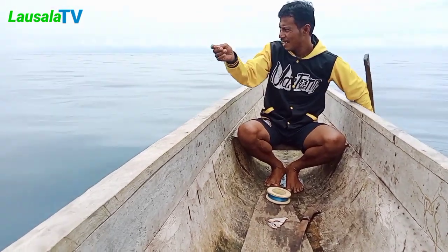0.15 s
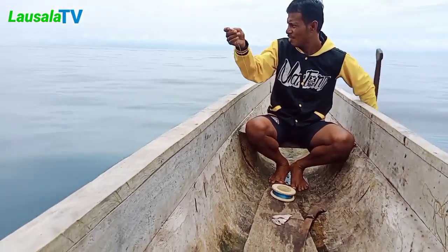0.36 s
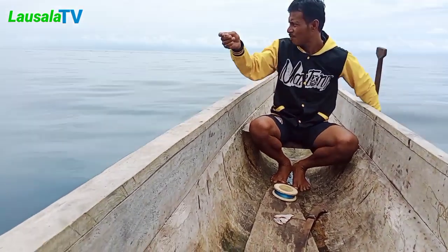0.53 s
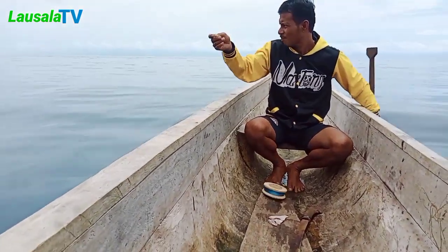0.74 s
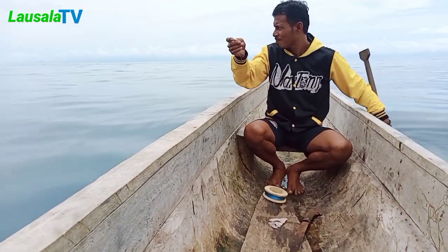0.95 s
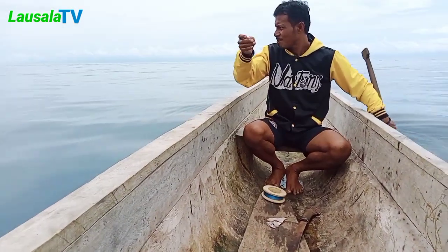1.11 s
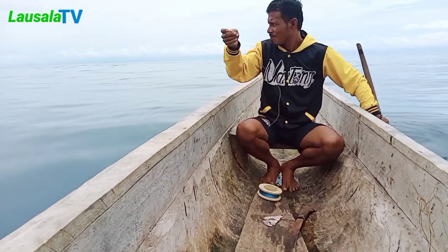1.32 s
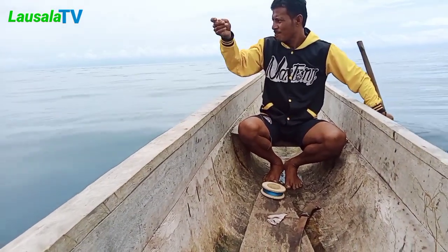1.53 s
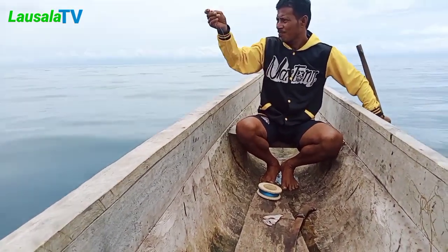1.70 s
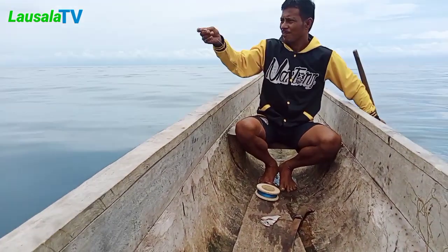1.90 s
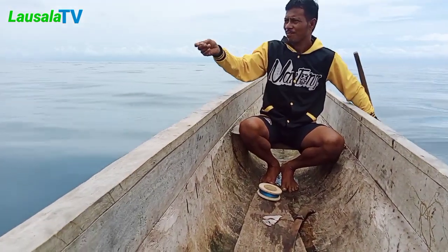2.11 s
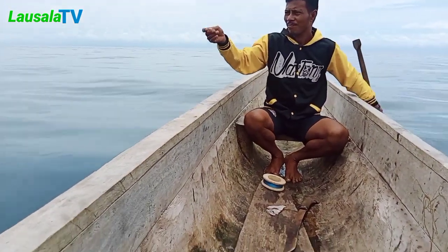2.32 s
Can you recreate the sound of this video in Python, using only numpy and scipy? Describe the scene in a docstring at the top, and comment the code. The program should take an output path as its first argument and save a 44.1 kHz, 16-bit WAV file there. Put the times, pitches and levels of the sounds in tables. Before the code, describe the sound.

Hollow wooden knock of a paddle on a small boat's side, quick bounces and snaps, then a lull of faint water trickle and gurgle before another lighter double knock; close single microphone outdoors, no echo.

```python
"""Water is heard first, lapping and hissing quietly all around a small wooden boat on a calm sea.
A paddle knocks twice against the boat's side and bounces: pushes ring hull and shaft modes, dry, with no echo.
Bursts of clicks make the snaps, dying sines the drips and low thumps, gliding sines the squeaks and chirps.
Noise in bands makes the water, a gurgle and small ticks. One microphone channel takes it all."""
import sys
import numpy as np
from scipy import signal
from scipy.io import wavfile

SR = 44100
rng = np.random.default_rng(int(sys.argv[2]) if len(sys.argv) > 2 else 0)


def wav_out(sig):
    """Save sig, one row per channel (or a flat mono array), as 16-bit PCM at SR to the path in sys.argv[1]."""
    wavfile.write(sys.argv[1], SR, np.round(np.clip(np.atleast_2d(sig).T, -1, 1) * 32767).astype(np.int16))


def how_loud(loudness_db):
    """Turn decibels into a plain amplitude multiplier (0 dB gives 1, 20 dB gives 10)."""
    steps = np.asarray(loudness_db, float) / 20
    return 10 ** steps


N = 103635


def rms_one(x):
    """Scale to rms 1."""
    return x / np.sqrt(np.mean(x ** 2) + 1e-20)


def in_time(rows):
    """Columns of a table, joined by straight lines in time."""
    s, *columns = np.transpose(rows)
    return [np.interp(np.arange(N) / SR, s, c) for c in columns]


def drift(rate_hz):
    """Slow chance of spread 1: noise through two equal low-pass poles, drawn every 40 samples."""
    r = np.exp(-80 * np.pi * rate_hz / SR)
    white = rng.standard_normal(N // 40 + 2002)
    slow = signal.lfilter([1], [1, -2 * r, r * r], white)[2000:]  # skip the filter's start
    return np.interp(np.arange(N) / 40, np.arange(len(slow)), rms_one(slow))


def ring(modes, gains_db, swell_s):
    """Struck body: a sum of swelling, dying sines of alternating sign, half a second long."""
    hz, db, t60 = np.transpose(modes)[:, :, None]
    t = np.arange(SR // 2) / SR
    sign = (-1) ** np.arange(len(modes))[:, None]
    decay = how_loud(db + gains_db[:, None] - 60 * t / t60)
    swell = 1 - np.exp(-t / swell_s)
    return (sign * decay * swell * np.sin(2 * np.pi * hz * t)).sum(0)


def add(out, s, sound):
    """Lay a sound down at time s."""
    i = int(s * SR)
    out[i:i + len(sound)] += sound[:len(out) - i]


def banded_noise(spectrum, patchy_db, rate_hz):
    """Narrow bands of noise, each with its level and flicker; rms 1."""
    hz, db = np.transpose(spectrum)
    bands = int(5 * np.log2(hz[-1] / hz[0])) + 1  # about five per octave
    edges = np.geomspace(hz[0], hz[-1], bands + 1)
    white, together, out = rng.standard_normal((2, N)), drift(rate_hz / 2), 0
    for k, (low, high) in enumerate(zip(edges, edges[1:])):
        sos = signal.butter(2, [low, high], "band", fs=SR, output="sos")
        band = signal.sosfilt(sos, white[k % 2])
        level_db = np.interp(np.log(low * high) / 2, np.log(hz), db)
        flicker_db = patchy_db * (.6 * together + drift(rate_hz))
        out = out + band * how_loud(level_db + flicker_db)
    return rms_one(out)


TRICKLES_PER_S, TRICKLE_CYCLES = 200, 20.0   # typical rate; cycles in which a bubble dies by 60 dB


def trickles():
    """Tiny random bubbles, short dying sines over nearly three octaves; rms 1."""
    sizes = how_loud(3.0 * np.minimum(rng.exponential(1, N), 3))
    sizes = sizes * (rng.random(N) < TRICKLES_PER_S * how_loud(3.0 * drift(5)) / SR)
    dealt, out = rng.integers(0, 16, N), 0  # each bubble gets one of 16 pitches
    for k, hz in enumerate(np.geomspace(500, 3500, 16)):
        r = how_loud(-60 * hz / (TRICKLE_CYCLES * SR))
        w = 2 * np.pi * hz / SR
        strikes = sizes * (dealt == k) + 1e-18
        out = out + signal.lfilter([0, np.sin(w)], [1, -2 * r * np.cos(w), r * r], strikes)
    return rms_one(out)


# how lively the water around the boat is, as its hiss at the microphone: t/s, level/dB
LIVELINESS = [(0, -65), (.77, -65.5), (.81, -71), (1.62, -70.5), (1.7, -64.5), (1.9, -64.5), (2.18, -62),
              (2.35, -58)]
# colour of the hiss, relative level per Hz: f/Hz, level/dB
HISS_COLOUR = [(250, -6), (500, -12), (1600, -12), (3500, -15), (4600, -24.5), (5600, -28.5)]
# colour of the treble fizz, relative level per Hz: f/Hz, level/dB
FIZZ_COLOUR = [(4600, -10.5), (5800, -4.5), (6900, -12), (8200, -0.5), (9600, -11.5), (15500, -9)]
# the treble flutters up briefly: t/s, level rise/dB
FLUTTERS = [(0.053, 12), (0.472, 9), (0.644, 12), (0.711, 11), (1.011, 16.5), (1.82, 9), (2.212, 8)]
# low lapping at the microphone: t/s, level/dB
LAPPING = [(0, -56), (.22, -79), (.31, -46), (.65, -69), (2.03, -70.5), (2.11, -47), (2.35, -59.5)]
# colour of the lapping, relative level per Hz: f/Hz, level/dB
LAPPING_COLOUR = [(22, -42), (50, -13), (92, 0), (200, -7.5), (400, -13.5)]
TRICKLE_DB, FLUTTER_S = -5, 0.0099   # trickles against hiss; spread of each flutter
FIZZ_DB, FIZZ_FOLLOWS = -82, 1   # fizz at mean liveliness; share of the swing it follows


def sea():
    """Water noise: hiss with trickles, treble fizz that follows the liveliness, and low lapping."""
    t = np.arange(N) / SR
    lively_db, = in_time(LIVELINESS)
    hiss = banded_noise(HISS_COLOUR, patchy_db=.8, rate_hz=15.0)
    water = how_loud(lively_db) * (hiss + how_loud(TRICKLE_DB) * trickles())
    rise_db = sum(db * np.exp(-.5 * ((t - s) / FLUTTER_S) ** 2) for s, db in FLUTTERS)
    fizz_db = FIZZ_DB + FIZZ_FOLLOWS * (lively_db - lively_db.mean()) + rise_db
    fizz = how_loud(fizz_db) * banded_noise(FIZZ_COLOUR, patchy_db=1.2, rate_hz=25.0)
    lap_db, = in_time(LAPPING)
    lapping = how_loud(lap_db) * banded_noise(LAPPING_COLOUR, patchy_db=1.5, rate_hz=2.0)
    return water + fizz + lapping


# drips and low thumps, level before the swell, f at the start: t/s, level/dB, f/Hz, t60/s
DRIPS_AND_THUMPS = [(.0225, -44.5, 1910, 0.062), (0.0271, -35.5, 3080, 0.0063), (0.101, -43.5, 106.6, 0.07),
                    (.179, -46.5, 3370, 0.039), (0.409, -38.5, 1200, 0.028), (.645, -41.5, 563, 0.052),
                    (0.667, -51.5, 1630, 0.066), (0.707, -50, 800, 0.022), (1.856, -48, 115.2, 0.046)]


def drips_and_thumps():
    """Single drips and soft low thumps: a sine that swells, dies and rises a little."""
    out, t = np.zeros(N), np.arange(SR // 5) / SR
    for s, db, hz, t60 in DRIPS_AND_THUMPS:
        swell = 1 - np.exp(-t / (0.021 * t60))
        tone = np.sin(2 * np.pi * hz * t * (1 + 0.08 * t / t60))
        add(out, s, how_loud(db - 60 * t / t60) * swell * tone)
    return out


# faint high chirps, peak level: t/s, length/s, level/dB
CHIRPS = [(0.136, 0.052, -75), (.485, 0.041, -77.5), (1.159, 0.075, -81.5), (1.253, .055, -77)]
CHIRP_HZ, CHIRP_RISE_HZ = 7140, 659   # pitch at the start; rise by the end


def chirps():
    """Faint high whistles that swell, bend upward with a wavering pitch, and fade."""
    out, waver_hz = np.zeros(N), 90 * drift(150)
    for s, length, db in CHIRPS:
        u = np.arange(int(length * SR)) / (length * SR)
        hz = CHIRP_HZ + CHIRP_RISE_HZ * u ** 2 + waver_hz[int(s * SR):][:len(u)]
        tone = np.sin(2 * np.pi * np.cumsum(hz) / SR)
        add(out, s, how_loud(db) * np.sin(np.pi * u) * tone)
    return out


# paddle against the boat's side, heard dry: t/s, hull level/dB, shaft level/dB, contact/ms
KNOCKS = [(0.208, -22, -42, 1.03), (0.2156, -7, 4, 0.54), (.2310, -15.5, -22, 0.69), (0.291, -23, -25, 0.3),
          (0.2936, -16.5, -17, 0.18), (0.3044, -26, -9, 0.74), (0.34, -21, -27, 1.66),
          (0.354, -28, -35, 0.77), (0.3966, -34, -46, 0.36), (0.502, -33.5, -38, 3.4),
          (1.669, -42, -74.5, 1.51), (1.9511, -30.5, -28, 1.12), (2.0486, -11.5, -10, 0.26),
          (2.0585, -27.5, -21, 0.18), (2.1075, -22, -26.5, 0.19), (2.129, -27.5, -25, 2.1),
          (2.199, -37.5, -77, 1.2), (2.286, -42, -74, 1.74), (2.336, -33.5, -69, 3.1)]
# hull modes before scatter: f/Hz, relative level/dB, t60/s
HULL = [(167.24, -21, 0.3), (196, -15, 0.06), (277.7, -15.5, .09), (338, -13.5, 0.13), (435.4, -13, 0.1),
        (527.4, -10, 0.067), (668, -14, 0.08), (925, -12, .035)]
# paddle shaft modes before scatter: f/Hz, relative level/dB, t60/s
SHAFT = [(745.5, -3.5, 0.028), (813.3, -3.5, 0.011), (1205, -19, 0.03), (1369, -25, 0.046),
         (1634, -26, 0.042), (1940, -33, .03)]
# modes differ in level from blow to blow, hull modes in pitch too (as a share), and take a moment to swell
MODE_SCATTER_DB, PITCH_SCATTER, SWELL_S = 3, .025, 0.0007
# loose planks keep shaking the hull after a blow: level against the blow, decay, lumpiness
SHUDDER_DB, SHUDDER_T60_S, SHUDDER_ROUGH_DB = -31.5, 0.25, 6.5
SHUDDER_TILT_DB = -5.5   # per octave
# dry edge of a 1 ms contact, against the hull; harder contacts crack more
CRACK_DB, CRACK_S, CRACK_RISE_S = -30, 0.0069, .0005


def knocks():
    """Smooth pushes (longer = duller) ring hull and shaft, with a faint crack; a lumpy shudder follows."""
    out, strength, edge = np.zeros((3, N))
    t, hulls = np.arange(SR // 2) / SR, len(HULL)
    scatter = MODE_SCATTER_DB * rng.standard_normal((len(KNOCKS), hulls + len(SHAFT)))
    # only the first column, the pitch, is detuned
    detune = 1 + PITCH_SCATTER * rng.standard_normal((len(KNOCKS), hulls, 1)) * [1, 0, 0]
    for (s, hull_db, shaft_db, ms), chance_db, bend in zip(KNOCKS, scatter, detune):
        contact = ms * SR / 1000  # samples
        push = np.sin(np.pi * np.arange(int(contact) + 1) / contact) ** 2
        hull = ring(HULL * bend, hull_db + chance_db[:hulls], SWELL_S)
        shaft = ring(SHAFT, shaft_db + chance_db[hulls:], SWELL_S)
        add(out, s, signal.fftconvolve(hull + shaft, push / push.sum()))
        add(strength, s, how_loud(hull_db + SHUDDER_DB - 60 * t / SHUDDER_T60_S))
        crack_shape = np.exp(-t / CRACK_S) * (1 - np.exp(-t / CRACK_RISE_S))
        add(edge, s, how_loud(hull_db + CRACK_DB) / ms * crack_shape)
    shake = strength * rng.standard_normal(N) * how_loud(SHUDDER_ROUGH_DB * drift(90))
    hull_hz = np.array(HULL)[:, 0]
    tilt_db = SHUDDER_TILT_DB * np.log2(hull_hz / hull_hz[0])
    damped_hull = ring(HULL, tilt_db, SWELL_S) * np.exp(-t / .015)
    shudder = signal.fftconvolve(shake, damped_hull)[:N]
    band = signal.butter(4, [1400.0, 2600.0], "band", fs=SR, output="sos")
    crack = signal.sosfilt(band, edge * rng.standard_normal(N))
    return out + crack + shudder


# dry snaps: t/s, level/dB, extra level of the lowest mode/dB, extra level of the three highest/dB
SNAPS = [(0.3157, -28, -9.5, 0.5), (0.3226, -24.5, -10.5, -2), (0.3272, -27, 9.5, 2.5),
         (0.332, -43.5, 15.5, -3.5)]
# what snaps rings with: f/Hz, relative level/dB, t60/s
SNAPPER = [(1456, 3.5, 0.013), (2110, -13, 0.011), (3335, 0, 0.015), (4600, -5, 0.0057),
           (5830, -9.5, 0.006), (8086, -3, 0.0078), (11200, -14, 0.0041), (14200, -16, 0.0018)]
BURST_S, RASP_DB, RASP_S = .0005, -15, .004   # burst decay; fine crackle that trails each snap


def snaps():
    """A short ragged burst of clicks strikes small bright modes; the lowest mode rings on its own."""
    out, t = np.zeros(N), np.arange(300) / SR
    highest = np.arange(1, len(SNAPPER)) >= len(SNAPPER) - 3
    for (s, db, low_db, high_db), burst in zip(SNAPS, rng.standard_normal((len(SNAPS), 300))):
        burst = burst * (np.exp(-t / BURST_S) + how_loud(RASP_DB) * np.exp(-t / RASP_S))
        burst = burst / np.sqrt((burst ** 2).sum())
        bright = ring(SNAPPER[1:], db + high_db * highest, swell_s=.00004)
        add(out, s, signal.fftconvolve(bright, burst))
        add(out, s, ring(SNAPPER[:1], np.array([db + low_db]), swell_s=0.00045))
    return out


# faint gliding squeaks, one list each, rms level before flutter: t/s, f/Hz, level/dB
SQUEAKS = [
    [(.395, 1580, -62), (.45, 1696, -62.5), (.485, 1773, -69.5)],
    [(.498, 2014, -90), (.51, 1940, -62.5), (.545, 1800, -67.5), (.58, 1680, -54), (.6, 1620, -60.5),
     (.635, 1135, -68.5)],
]
SQUEAK_FLUTTER_DB = 3.5


def squeaks():
    """Thin gliding sines that flutter in level and waver slightly in pitch."""
    out, t = np.zeros(N), np.arange(N) / SR
    for rows in SQUEAKS:
        hz, db = in_time(rows)
        on = (t > rows[0][0]) & (t < rows[-1][0])
        level = np.sqrt(2) * how_loud(db + SQUEAK_FLUTTER_DB * drift(79))
        phase = 2 * np.pi * np.cumsum(hz * (1 + 0.0043 * drift(55))) / SR
        out += on * level * np.sin(phase)
    return out


GURGLE_START_S, GURGLE_TOP_S, GURGLE_END_S = 1.256, 1.311, 1.56
GURGLE_HZ, GURGLE_DB = 1559, -68   # band centre; rms level at the top, before flutter


def gurgle():
    """A narrow fluttering band of noise that swells quickly and fades slowly."""
    level = how_loud(GURGLE_DB + 3.0 * drift(40))
    band = signal.butter(2, [GURGLE_HZ * .9, GURGLE_HZ * 1.1], "band", fs=SR, output="sos")
    noise = rms_one(signal.sosfilt(band, rng.standard_normal(N)))
    swell = np.interp(np.arange(N) / SR, [GURGLE_START_S, GURGLE_TOP_S, GURGLE_END_S], [0, 1, 0])
    return level * swell * noise


# small ticks, level of the noise before its band: t/s, level/dB, low f/Hz, high f/Hz
TICKS = [(1.3333, -39, 895, 3870), (1.346, -53.5, 3116, 4970), (1.7738, -37.5, 1730, 5100)]
TICK_S = 0.0021   # decay


def ticks():
    """Tiny broad clicks: noise in one wide band that dies within milliseconds."""
    out, t = np.zeros(N), np.arange(SR // 50) / SR
    for (s, db, low_hz, high_hz), burst in zip(TICKS, rng.standard_normal((len(TICKS), SR // 50))):
        band = signal.butter(5, [low_hz, high_hz], "band", fs=SR, output="sos")
        add(out, s, how_loud(db) * signal.sosfilt(band, burst * np.exp(-t / TICK_S)))
    return out


def scene():
    """Everything around the boat, in one channel."""
    mix = knocks() + snaps() + ticks() + drips_and_thumps() + squeaks() + chirps() + gurgle() + sea()
    return mix[None]


def roll_off(x):
    """The treble ends steeply here."""
    return signal.sosfilt(signal.butter(12, 15790, fs=SR, output="sos"), x)


def record(dry):
    """The microphone drops the deep bass and the very top."""
    bass_cut = signal.butter(2, 30.0, "high", fs=SR, output="sos")
    top_cut = signal.cheby2(12, 60, 16000, fs=SR, output="sos")
    mix = signal.sosfilt(top_cut, signal.sosfilt(bass_cut, dry))
    return roll_off(mix)


dry = scene()
out = record(dry)
wav_out(out)
```